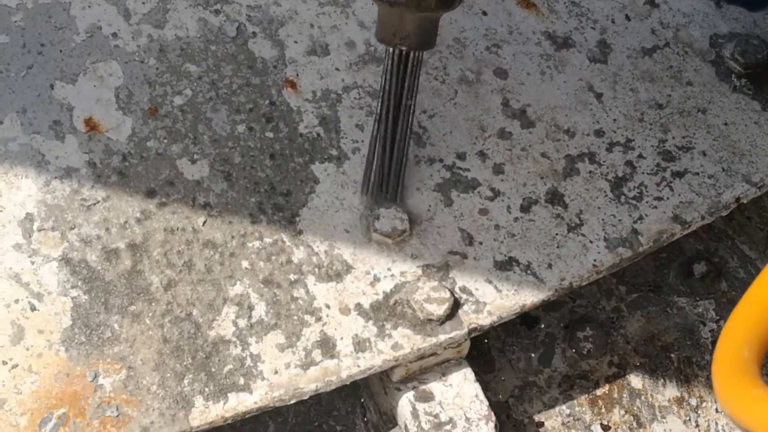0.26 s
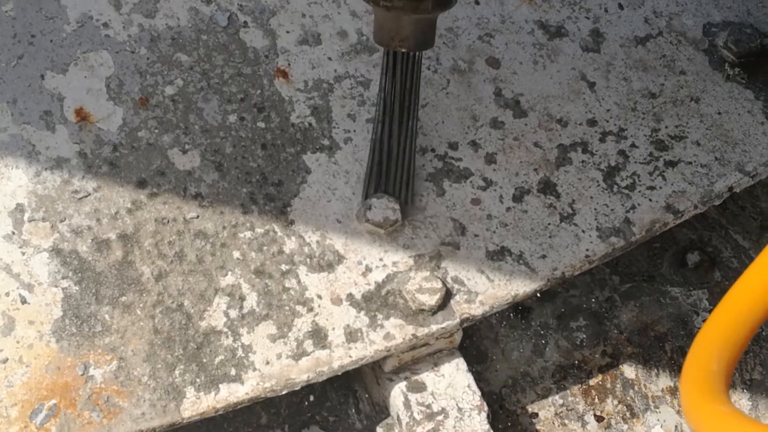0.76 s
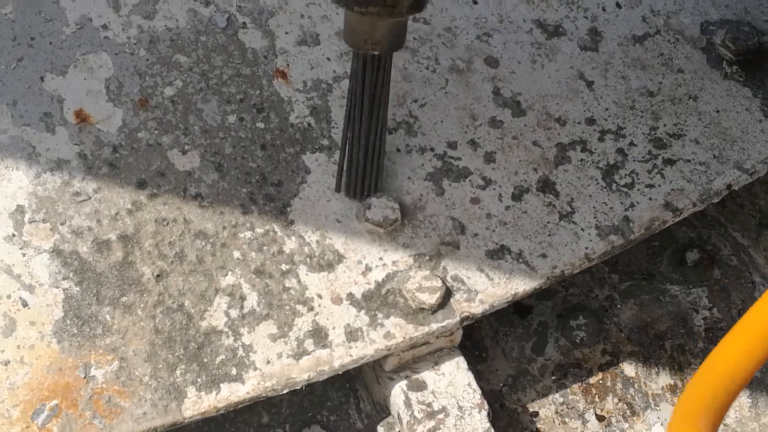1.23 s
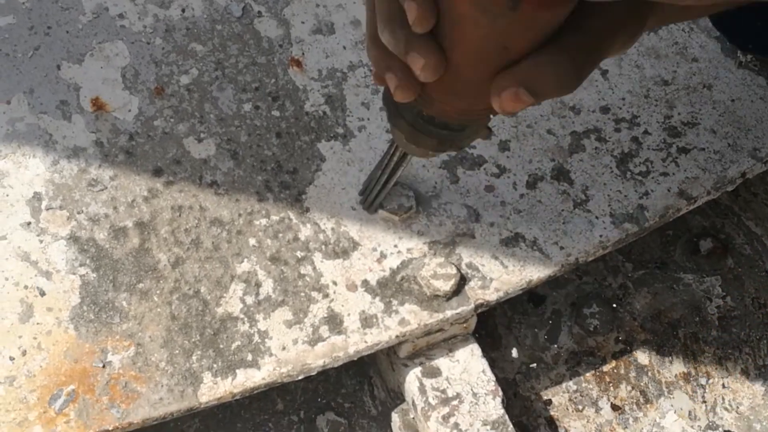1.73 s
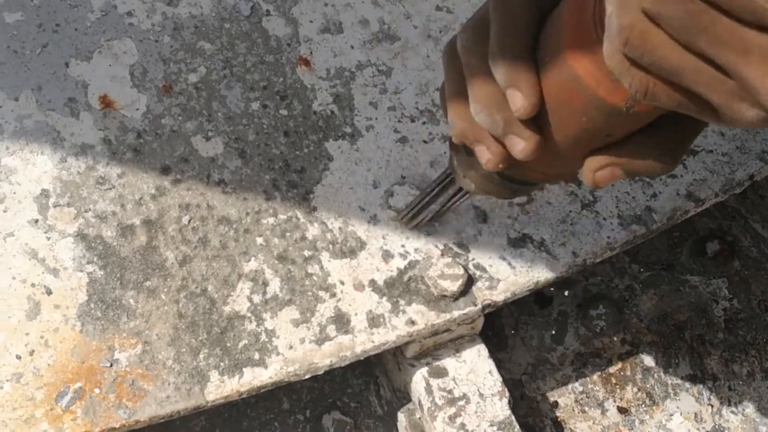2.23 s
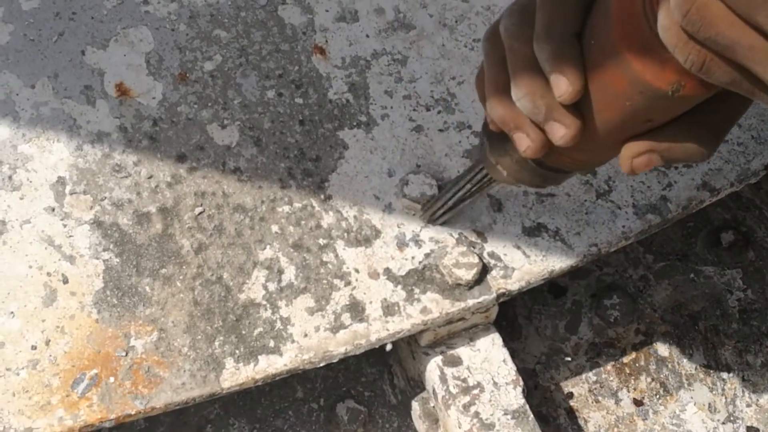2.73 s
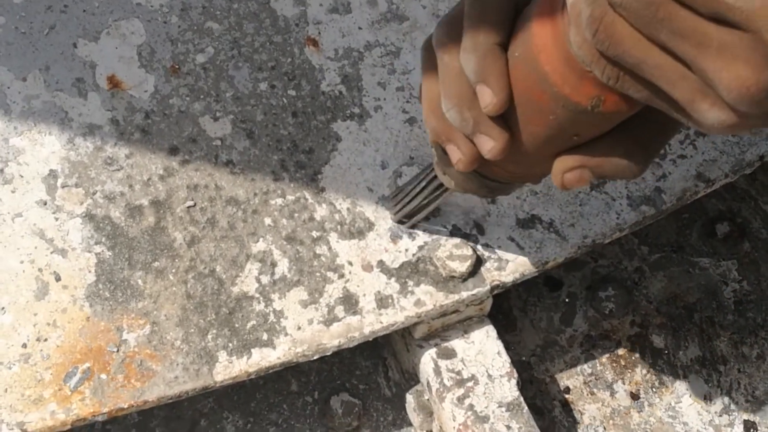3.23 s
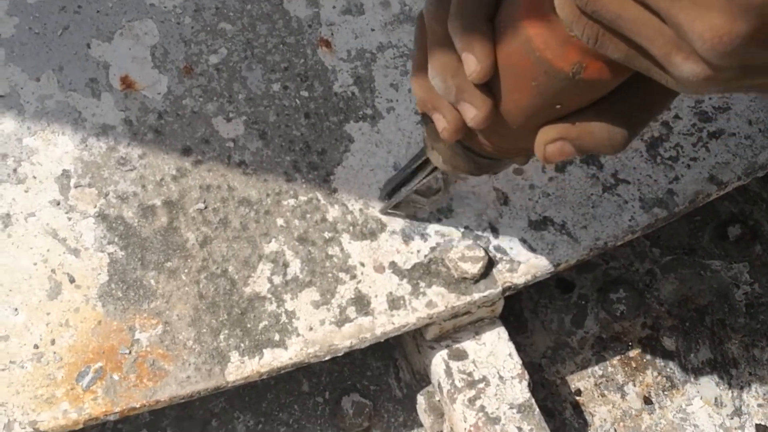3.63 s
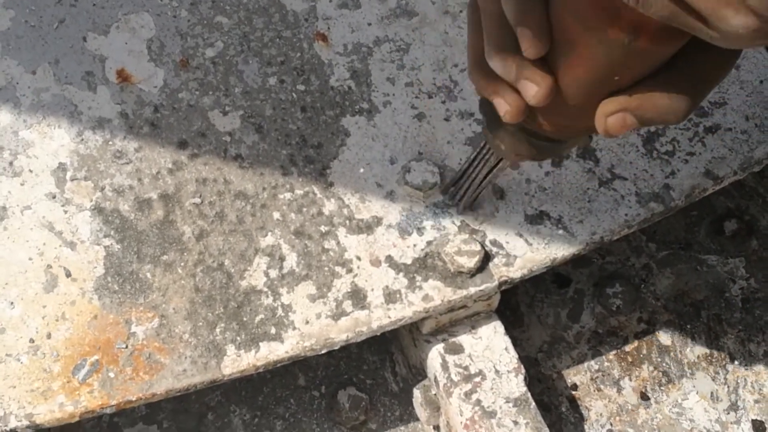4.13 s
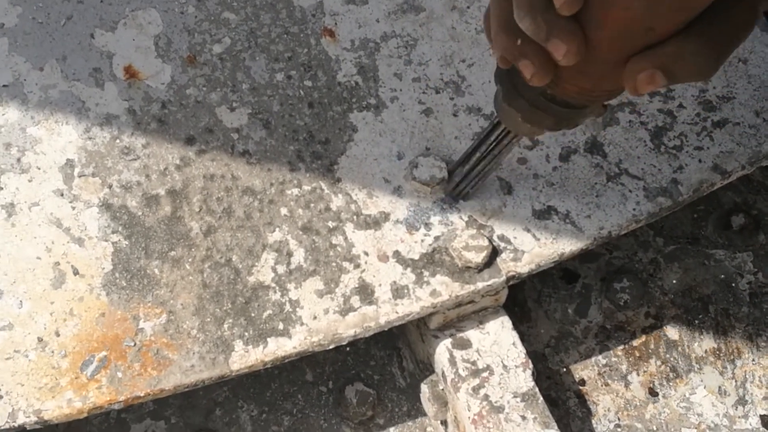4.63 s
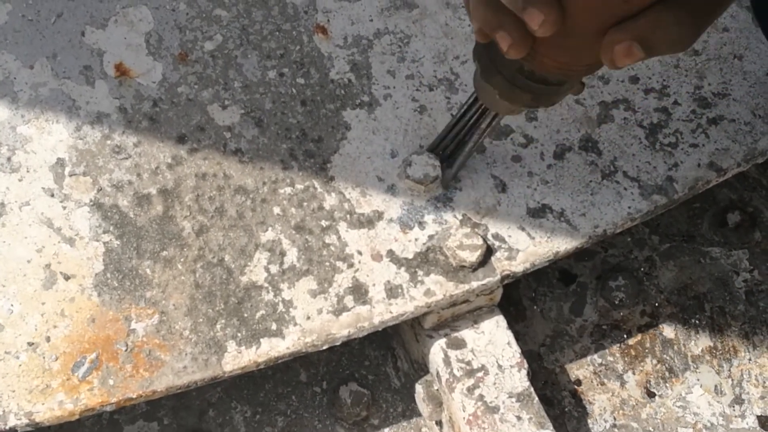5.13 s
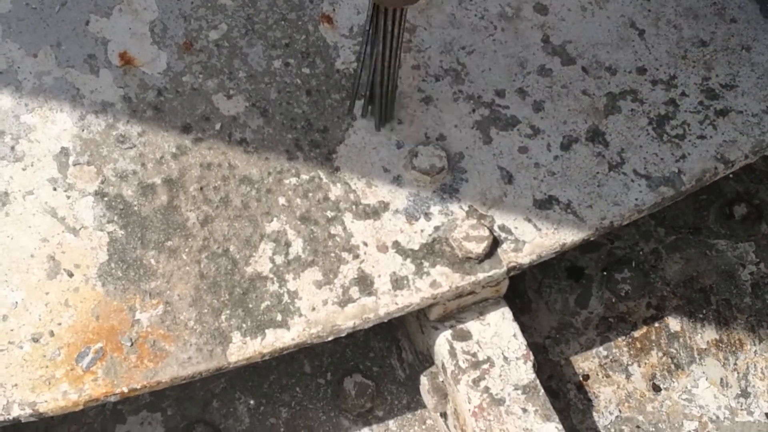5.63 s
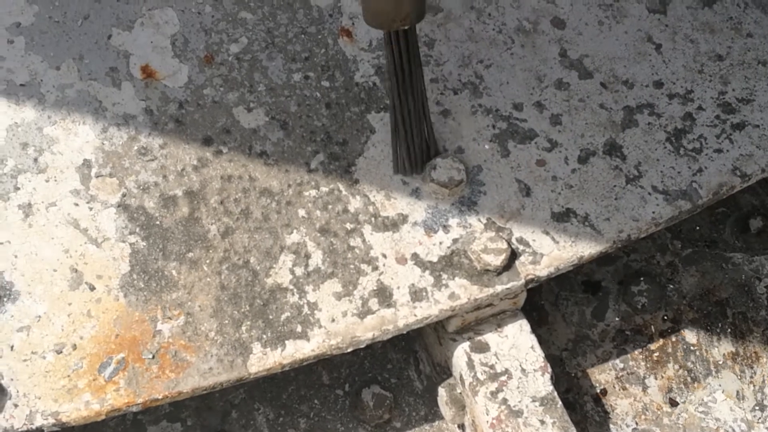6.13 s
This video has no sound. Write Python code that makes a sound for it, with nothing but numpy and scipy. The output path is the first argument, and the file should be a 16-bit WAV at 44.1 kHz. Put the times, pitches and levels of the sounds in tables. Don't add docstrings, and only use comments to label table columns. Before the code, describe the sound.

From 0 s a pneumatic needle scaler is already running hard right by the microphone: a dense metallic buzz-rattle at about 53 strokes a second, with bright ringing needle hiss, midrange plate clatter, throaty exhaust puffs and a low tool drone. Sharp flake cracks crowd the first 1.5 s, and a high shank ring sings out around 1.2 s. From about 1.6 to 5.2 s the tool leans over; cracks come sparser, the needle tone shifts, and the plate clatter presses forward near 3.6 s. Gritty skids appear at 1.6 s and between 4.1 and 5.7 s. After 5.5 s, upright again, crackling thickens until the cut at 6.4 s. Farther hammer blows boom and clang through the deck, paired roughly every half second until 3.5 s, then single near 3.8, 4.2, 4.7, 5.1, 5.6 and 6.0 s. The left is crisp; the right later and muffled.

```python
import sys
import numpy as np
from scipy import signal
from scipy.fft import rfft, irfft, next_fast_len
from scipy.io import wavfile
from scipy.ndimage import uniform_filter1d

SR = 44100
rng = np.random.default_rng(int(sys.argv[2]) if len(sys.argv) > 2 else 0)


def how_loud(loudness_db):
    steps = np.asarray(loudness_db, float) / 20
    return 10 ** steps


def log_audio(samples):
    frames = np.atleast_2d(samples).T
    limited = np.clip(frames, -1, 1)
    pcm = np.round(limited * 32767).astype(np.int16)
    wavfile.write(sys.argv[1], SR, pcm)


N = 280917
T = np.arange(N) / SR
HZ = np.fft.rfftfreq(next_fast_len(N + SR // 2), 1 / SR)

# [time_s, lead_strokes]
PISTON_LEAD = [(0, -.24), (.25, -.53), (.8, -.53), (1, -.86), (1.2, -.9), (1.5, -1.25), (1.8, -1.27),
               (2.2, -1.87), (2.75, -1.88), (2.95, -1.67), (3.25, -1.78), (3.8, -1.14), (4.1, -1.57),
               (4.4, -1.51), (4.75, -1.21), (5.7, -1.13), (6, -.89), (6.37, -.22)]
# [time_s, pressure_db, facing_db]
WORK = [(0, -1.5, 3), (.53, 0.5, -0.5), (1.04, -2.5, -1), (1.42, -0.5, -2.5), (2.18, -2.5, -1.5),
        (3.6, 1, -4.5), (4.03, -1, -1), (5.02, 1, -2), (5.62, 0.5, 1), (5.98, -1.5, -2.5), (6.37, -4, 1)]
# [time_s, upright_0_to_1]
STANCE = [(0, 0.8), (1.1, 0.93), (1.7, 0.6), (2.2, 0.06), (5.2, 0.23), (5.55, 1), (6.37, 1)]
# [time_s, covered_0_to_1]
GRIP = [(0, 0.07), (4.9, 0.08), (5.25, 0.11), (5.6, 0.09), (5.8, 0), (6.37, 0.09)]
# [time_s, level_db]
SHANK_SINGING = [(0, -1), (1.08, -7), (1.16, 4.5), (1.55, -4), (1.9, -5.5), (3.6, -6), (4.7, -3), (5.5, -4),
                 (5.75, -4), (6.37, -4)]

# [pitch_hz, width_hz, level_db]
NEEDLES_SLANT = [(6450, 510, -10), (7800, 170, -14), (8280, 1000, -10), (9800, 350, -7.5),
                 (13200, 300, -15), (14200, 200, -10.5)]
NEEDLES_UPRIGHT = [(4510, 300, -7), (6300, 360, -15), (8040, 490, -9), (9920, 380, -5.5)]
# [pitch_hz, width_hz, level_db]
SHANK_SLANT = [(13480, 110, -6), (13600, 110, -6)]
SHANK_UPRIGHT = [(13480, 120, -6), (13600, 120, -7.5)]
# [pitch_hz, width_hz, level_db]
SHANK_LONG = [(10597, 75, -2)]
# [pitch_hz, width_hz, level_db]
EXHAUST_OPEN = [(896, 123, 5), (1182, 176, -4), (1630, 67, -35)]
EXHAUST_COVERED = [(940, 150, -13.5), (1200, 960, 15), (1850, 96, 16)]
# [pitch_hz, density_db_per_hz]
NEEDLE_HISS = [(3000, -37), (5500, -17.5), (7000, -22), (9000, -16.5), (12000, -16.5), (15500, -18.5)]
PLATE_CLATTER = [(150, -18), (400, 0.5), (650, -0.5), (1200, -5.5), (2100, -1), (3300, 2.5), (4200, -2),
                 (5500, -7.5), (9000, -17), (16000, -10.5)]
TOOL_DRONE = [(20, -22), (50, -16), (100, -5), (170, 0), (250, -1), (400, -7), (700, -18), (1200, -40)]

# [start_s, peak_db, treble_db, shove_db]
FLAKES = [(.0228, -3.5, -8, -31), (.1194, -22, 11, -21), (.271, -8, 0, -19), (.5744, -5.5, 5, -27),
          (.745, -2.5, -20, -24), (.7984, -4, -17, -23), (.8799, -3.5, -18, -22), (.9385, -3.5, -21, -29),
          (1.2013, -1, -5, -34), (1.3062, -4.5, -24, -37), (1.66, -5.5, -9, -31), (1.9687, -14, 5, -18),
          (2.0685, -7, -20, -37), (2.2203, -12, 3, -27), (2.432, -16, -7, -16), (2.5066, -12.5, -2, -17),
          (2.7881, -9.5, -9, -20), (3.0485, -5, -24, -22), (3.2384, -9, -2, -19), (3.426, -16.5, 7, -27),
          (3.6282, -14, 7, -32), (3.9452, -18, 2, -25), (4.627, -7, -6, -20), (4.7951, -4.5, -9, -22),
          (4.9641, -1, -7, -25), (5.022, -11, -8, -20), (5.5284, 0, -5, -40), (5.9233, -10, -5, -21),
          (6.2113, -7.5, -3, -23), (6.326, -4, -9, -24)]
# [start_s,
# crack_db, treble_over_crack_db]
BITES = [(0.0421, -14.5, 9), (0.0954, -19, 18), (0.1573, -7, 1), (0.163, -7, 2), (0.1715, -9, -6),
         (0.1817, -21, -9), (0.196, -13, 10), (0.2342, -15, 16), (0.2538, -18, 7), (0.369, -9, 7),
         (0.4063, -4, 4), (0.4187, -10, -1), (0.4446, -10, -7), (0.4576, -14.5, -4),
         (0.4811, -12, 7), (0.4951, -16, -2), (0.5197, -9, 3), (0.587, -13, 13), (0.6133, -20, 9),
         (0.6263, -4, 1), (0.6406, -4, -9), (0.648, -16, -17), (0.655, -13, -13), (0.6626, -14, -7),
         (0.6684, -11, 16), (0.7076, -20, 19), (0.7215, -10, 2), (0.758, -8.5, 9), (0.7841, -20, 9),
         (0.824, -21, 18), (0.836, -20, 21), (0.8773, -12, 16.5), (0.9004, -14, 0),
         (0.913, -9.5, 6), (0.96, -20, 9), (0.972, -10, 0), (1.0343, -14.5, 10), (1.047, -11, 15),
         (1.0733, -23, 12), (1.0857, -20, 20), (1.0988, -9, -8), (1.1089, -11, 4), (1.122, -18, 18),
         (1.1347, -6, -4), (1.141, -17, -10), (1.1495, -3, -5), (1.1546, -14, -10),
         (1.1878, -14, 7), (1.2237, -25, 14), (1.262, -11, 2), (1.2748, -6.5, 0), (1.302, -8.5, -1),
         (1.3222, -5.5, 6), (1.3426, -12, 3), (1.3787, -16, 14), (1.3983, -15.5, 19),
         (1.4384, -10, 11), (1.4753, -11, 3), (1.5086, -16, 13), (1.5152, -6, -9),
         (1.5465, -7, 8), (1.5494, -9, 13), (1.5699, -9, 12), (1.6071, -7, 13), (1.62, -12, -1),
               (1.6241, -17, 4), (1.6317, -20, -3), (1.6458, -13, 3), (1.6634, -15, 6), (1.703, -8, 0),
               (1.7223, -12, 7), (1.74, -13, 1), (1.76, -28, 23), (1.894, -21, 14), (1.9117, -26, 17),
               (1.9518, -30, 21), (1.991, -19, 12), (1.9953, -12, -10), (2.0284, -21, 16),
               (2.0974, -6, -11), (2.107, -23, -9), (2.116, -18, -8), (2.1232, -7, 5), (2.1269, -11, 1),
               (2.167, -25, 16), (2.2986, -30, 16), (2.4484, 0, -15), (2.5816, -2, -10), (2.589, -10, -10),
               (2.5975, -18, -10), (2.6025, -16, -8), (2.62, -24, 9), (2.7322, -32, 11), (2.77, -19, 14),
               (2.9127, -3, -4), (2.919, -12, 6), (3.0329, -11.5, 15), (3.1444, -5.5, 3), (3.1829, -7.5, 2),
               (3.314, -24, 22), (3.364, -4, -5), (3.3696, -12, -2), (3.479, -24, 20), (3.505, -3, -5),
               (3.5093, 4, -11), (3.517, -11, 1), (3.555, -24, 15), (3.592, -18, 15), (3.716, -18.5, 22),
               (3.777, -32, 14), (3.8538, -23, 16), (3.9073, -25, 13), (3.9269, -25, 19), (3.9654, -19, 9),
               (4.0046, -32, 14), (4.0444, -9, 11), (4.0827, -10.5, 12), (4.1037, -20, 12),
               (4.1223, -14, 6), (4.2143, -26, 18),
         (4.2364, -9, -4), (4.256, -22, 4), (4.4252, -11, 8), (4.4624, -28, 14), (4.6827, -3, -3),
              (4.6902, -9, -8), (4.9082, -27, 21), (4.9831, -26, 8), (5.0756, -28, 18), (5.1199, -8, -10),
              (5.1647, -18.5, 17), (5.264, -27, 11), (5.283, -24, 19), (5.3182, -19, 19),
              (5.3336, -16, 9.5), (5.338, -16, 8), (5.3971, -11.5, 3), (5.4534, -13, 8), (5.4926, -9, 14),
              (5.547, -10, 15), (5.5669, -7, 5), (5.5868, -3, -4), (5.599, -11, 16), (5.606, -6, 0),
              (5.6253, -8, 9), (5.646, -9, 2), (5.663, -16, 6), (5.6766, -9, 10), (5.6847, -16, 1),
              (5.7008, -2, 1), (5.7205, -13, 16), (5.7404, -1, 1), (5.7735, -8, 5), (5.7923, -8, 15),
              (5.8101, -11, 19.5), (5.83, -11, 2), (5.8472, -22, 10), (5.864, -12, 7), (5.884, -18, 8),
              (5.8971, -8.5, 8), (5.9044, -5, -1), (5.9413, -12, 5), (5.9618, -26, 19), (5.975, -19, 20),
              (5.9801, -12, 3), (6.017, -8.5, 9), (6.024, -10, -5), (6.034, -21, 7), (6.054, -6.5, 5),
              (6.0686, -17, 1), (6.0861, -9, 1), (6.1225, -4, 9), (6.1414, -4, -7), (6.2159, -8, 8),
              (6.23, -11, 2), (6.253, -25, 15), (6.269, -3.5, 6.5), (6.2882, -15, 7), (6.307, -13, 8),
              (6.3623, -18, 16)]
# [pitch_hz, density_db_per_hz]
FLAKE_CRACK = [(150, -7), (600, -4.5), (1500, 0.5), (3000, -1.5), (5000, 0.5)]
# [pitch_hz, width_hz, level_db]
SCALE_SPOTS = [
    [(1550, 130, -7.5), (3410, 460, 4)],
    [(2540, 190, -1), (4400, 320, -3)],
    [(1800, 200, -8), (3840, 190, 4)],
]
# [pitch_hz, width_hz, level_db]
NEEDLE_TIPS = [(6530, 460, -1.5), (8180, 500, -8.5), (9380, 340, -5.5)]
# [start_s, length_s, level_db]
SKIDS = [
    (.24, 0.046, -34),
    (1.58, 0.11, -23),
    (4.147, 0.042, -24.5),
    (4.265, 0.023, -31),
    (5.163, 0.094, -27),
    (5.261, 0.056, -29),
    (5.33, 0.063, -22.5),
    (5.448, .04, -26),
    (5.557, .07, -29),
    (5.66, 0.11, -25.5),
]
# [pitch_hz, density_db_per_hz]
SCRAPE = [(300, -28), (900, -5), (1300, 3.5), (2200, -6), (3200, 1), (4600, -4.5), (7000, -14),
          (16000, -22)]

# [start_s, peak_db, boom_db, clang_db, knock_db]
HAMMER = [(0.158, -7.5, -4, -7, -20), (0.236, -22.5, -2, -6, 15), (0.6432, -5.5, -4.5, -10, -11),
          (1.0982, -14, -5, -9.5, 9), (1.1345, -7, -7, -11, -2), (1.5473, -11.5, -13, -5, -2),
          (1.6145, -6.5, -10, -13.5, -25), (1.995, -16, -2.5, -16, 8), (2.0963, -8.5, -4, -8, -4),
          (2.4468, -12.5, -9, -9.5, 7.5), (2.5803, -7.5, -4, -9.5, -6), (2.9144, -13, -10, -9, 7.5),
          (3.0428, -7.5, 1.5, -13, -6), (3.367, -16, -6, -5.5, 9), (3.5035, -7, -3, -8, -9),
          (3.817, -26, -13, -49, 17), (4.237, -16, -23, -6.5, 5.5), (4.6866, -11.5, -9, -14, 10.5),
          (5.1208, -23.5, 8, 0, 14), (5.5671, -15, -4.5, -8, -8), (6.0251, -14, -0.5, -18, 8.5)]
# [pitch_hz, level_db, t60_s]
BOOM = [(167, -15.5, 0.76), (237, 0, 0.24), (293, -6, 0.082), (337.7, -5.5, 0.15), (408, -6, 0.27),
        (484.7, -8.5, 0.4)]
# [pitch_hz, density_db_per_hz]
BLOW = [(60, -28.5), (150, -6.5), (500, -3.5), (700, -2.5), (1000, -6.5), (1800, -2), (2300, -8.5),
        (4000, -10.5), (6000, -24.5), (10000, -34.5)]
# [pitch_hz, width_hz, level_db]
DECK = [(895, 99, -2), (1550, 37, 4), (1770, 50, -12), (2620, 74, 4), (2800, 950, -4), (3880, 56, -48)]
# [pitch_hz, t60_s]
DECK_T60 = [(100, 0.89), (260, 0.31), (700, 0.39), (1840, 0.14), (4850, 0.089)]
# [pitch_hz, width_hz, level_db]
NEAR_PANEL = [(950, 190, 0)]

# [pitch_hz, weaker_db, later_rad, likeness_0_to_1, more_weaker_when_upright_db]
NEAR_SHADOW = [(20, 0, .1, .97, 0), (170, 0, .7, .92, 0), (350, 2, 1.6, .9, 0), (690, 8, 3.2, .8, 0),
               (800, 9, 4.6, .3, 0), (950, 7, 6.3, .75, 1), (1550, 4, 6.5, .75, 3), (2240, 2, 7.8, .45, 5),
               (3400, 4, 7.6, .35, 4), (4100, 3, 9.7, .45, 4), (4900, 13, 10.5, .3, 0),
               (5900, 14, 10.8, .3, 0), (7750, 24, 14.5, .55, 1), (15000, 36, 32, .45, 0)]
# [pitch_hz, weaker_db, later_rad, likeness_0_to_1, more_weaker_when_upright_db]
FAR_SHADOW = [(20, -1, .1, .97, 0), (170, -1, 1, .97, 0), (350, 0, 1.7, .95, 0), (690, 6, 3, .9, 0),
              (1030, 9, 3.3, .5, 0), (1300, 4, 4.5, .4, 0), (1700, 11, 5.2, .4, 0), (2800, 6, 6.3, .35, 0),
              (4100, 5, 10.5, .4, 0), (5900, 10, 10.5, .3, 0), (7750, 23, 14.2, .4, 0),
              (15000, 30, 32, .4, 0)]


def strokes(listed):
    beat = 53 * T + curves(PISTON_LEAD)[0]
    even = np.interp(np.arange(340) - .1, beat, T, right=7)
    nearest = np.abs(listed - even[:, None]).argmin(axis=1)
    off = listed[nearest] - even
    hard = np.abs(off) < .003
    return even + np.interp(even, even[hard], off[hard]), hard


def scaler(listed):
    press_db, facing_db = curves(WORK)
    upright = np.clip(curves(STANCE)[0], 0, 1)
    hit, hard = strokes(listed)
    luck = rng.standard_normal((len(hit), 5))
    force_db = 1.7 * luck[:, 0] - 3.5 * ~hard
    early_db = -7.5 + 2.5 * luck[:, 2] - 3.5 * (np.arange(len(hit)) % 2)
    blur = np.exp(.5 * luck[:, 1]) * np.where(hard, 1, 2.2)
    ring = needles(hit, force_db, early_db, blur, upright)
    landing_db = force_db + 1.2 * luck[:, 3]
    clatter = plate(hit, landing_db, early_db + 3 * np.interp(hit, T, upright), blur)
    puffs = exhaust(hit, 0.3 * force_db + .9 * luck[:, 4])
    hum = drone(hit, force_db)
    mix = how_loud(-21.5 + 0.05 * press_db) * unit(ring)
    mix = mix + how_loud(-26 + press_db) * unit(clatter)
    mix = mix + how_loud(-29.5 + facing_db) * unit(puffs)
    return mix + how_loud(-35 + 0.64 * press_db) * unit(hum)


def needles(hit, force_db, early_db, blur, upright):
    chatter = how_loud(3 * rng.standard_normal(N)) * rng.standard_normal(N)
    volley = volleys(hit, force_db, early_db, blur, head=0.0013, tail=.0042, tail_db=-5, count=45)
    knocks = volley + how_loud(-8.5) * unit(chatter)
    ring = filtered(knocks * (1 - upright), causal(NEEDLE_HISS, NEEDLES_SLANT + SHANK_SLANT))
    ring = ring + filtered(knocks * upright, causal(NEEDLE_HISS, NEEDLES_UPRIGHT + SHANK_UPRIGHT))
    ring = ring + filtered(knocks * how_loud(curves(SHANK_SINGING)[0]), ringing(SHANK_LONG))
    return patchy(ring, depth_db=2.0)


def plate(hit, force_db, early_db, blur):
    landing = volleys(hit, force_db, early_db, blur, head=.0006, tail=.0035, tail_db=-7, count=20)
    grit = patchy(rng.standard_normal(N), depth_db=5.0)
    return filtered(landing + how_loud(-4) * unit(grit), causal(PLATE_CLATTER))


def exhaust(hit, puff_db):
    puffs = taps(hit - 0.0003, puff_db, .0014, scatter_db=1.0, count=40)
    air = unit(puffs) + how_loud(-4) * rng.standard_normal(N)
    covered = np.clip(curves(GRIP)[0], 0, 1)
    open_part = filtered(air * (1 - covered), ringing(EXHAUST_OPEN))
    return open_part + filtered(air * covered, ringing(EXHAUST_COVERED))


def drone(hit, force_db):
    thuds = taps(hit, force_db, 0.00242, scatter_db=0.5, count=4)
    return filtered(unit(thuds) + how_loud(-1.5) * rng.standard_normal(N), causal(TOOL_DRONE))


def volleys(hit, force_db, early_db, blur, head, tail, tail_db, count):
    early = hit - .0052 + .0008 * rng.standard_normal(len(hit))
    tight = taps(hit, force_db, head * blur, scatter_db=2, count=count)
    tight = tight + taps(early, early_db - 1, head, scatter_db=2, count=count)
    loose = taps(hit, force_db + tail_db, tail, scatter_db=3, count=3 * count)
    loose = loose + taps(early, early_db + tail_db, .7 * tail, scatter_db=3, count=3 * count)
    return unit(tight + loose)


def strikes():
    s, db, treble_db = np.transpose(BITES)
    shove_db = -29 + 4.5 * rng.standard_normal(len(s))
    bites = np.c_[s + .0004, db + 1, treble_db - 9, shove_db]
    return np.r_[FLAKES, bites]


def flakes(hard):
    s, db, treble_db, shove_db = np.transpose(hard)
    spot = np.arange(len(s)) % len(SCALE_SPOTS)
    colour = [(30, -32.0)] + FLAKE_CRACK + [(8000, -14.5), (16000, -16)]
    crack = 0
    for k, modes in enumerate(SCALE_SPOTS):
        at, size_db = s[spot == k], db[spot == k] + 6.5
        snap = taps(at, size_db, .0003, scatter_db=0.5, count=15)
        crumbs = taps(at, size_db - 12, .0017, scatter_db=3.5, count=40)
        crack = crack + filtered(snap + crumbs, causal(colour, modes))
    kick_db = db + treble_db + 4.5
    kick = taps(s, kick_db, .0013, scatter_db=1, count=60)
    kick = kick + taps(s, kick_db - 7, .0028, scatter_db=1.5, count=80)
    bright = filtered(kick, causal(NEEDLE_HISS, NEEDLE_TIPS + SHANK_UPRIGHT))
    push_db = np.minimum(db + shove_db, -31)
    push = np.bincount((s * SR).astype(int), -how_loud(push_db + 42.0), N)[:N]
    shove_spectrum = [(1, -9), (15, 10.0), (40, 9.5), (100, 9.0), (300, -2.5), (900, 6.0), (3000, -84.0)]
    return crack + bright + filtered(push, causal(shove_spectrum))


def skids():
    swell = 0
    for s, length, db in SKIDS:
        swell = swell + how_loud(db) * np.sin(np.pi * np.clip((T - s) / length, 0, 1)) ** .5
    grains = how_loud(5 * rng.standard_normal(N)) * rng.standard_normal(N)
    return swell * unit(patchy(filtered(grains, causal(SCRAPE)), depth_db=5.0))


def deck_wash(t, rise_s):
    hz, frames, z = signal.stft(rng.standard_normal(len(t)), SR, nperseg=256)
    fade_db = -60 * frames / along(DECK_T60, hz)[:, None]
    wash = signal.istft(z * how_loud(fade_db), SR, nperseg=256)[1][:len(t)]
    return wash * (1 - np.exp(-t / max(rise_s, 2e-4)))


def deck_boom(t):
    ring = 0
    luck = rng.standard_normal((len(BOOM), 2))
    for (hz, level, t60), (a, b) in zip(BOOM, luck):
        ring = ring + how_loud(level + 2 * a - 60 * t / t60) * np.sin(2 * np.pi * hz * (1 + 0.016 * b) * t)
    return ring


def packet(t, arrive_s, hz, width_s):
    return np.cos(2 * np.pi * hz * (t - arrive_s)) * np.exp(-((t - arrive_s) / width_s) ** 2)


def hammer():
    dull, clang, knock, boom = np.zeros((4, N + SR))
    t = np.arange(SR // 2) / SR
    swing = 1 + .4 * np.exp(-t / .012)
    thump = packet(t, arrive_s=0.00579, hz=328, width_s=0.0029)
    thock = packet(t, arrive_s=0.00464, hz=867, width_s=0.0015)
    for s, db, boom_db, clang_db, knock_db in HAMMER:
        wash = deck_wash(t, rise_s=0.0022 * how_loud(0.35 * (db + boom_db - 1.0)))
        ring = deck_boom(t)
        at = round(s * SR)
        ahead = round(0.003 * SR * (db < -10.5))
        dull[at:][:len(t)] += how_loud(db + 15.0) * wash
        clang[at - ahead:][:len(t)] += how_loud(db + clang_db + 24.5) * wash
        knock[at:][:len(t)] += how_loud(db + knock_db + 12.0) * wash * how_loud(-60 * t / 0.26)
        boom[at:][:len(t)] += how_loud(db + boom_db - 6.5) * ring * (1 - np.exp(-t / 0.002)) * swing
        boom[at:][:len(t)] += how_loud(db + boom_db + 0.5) * thump
        boom[at:][:len(t)] += how_loud(db + max(knock_db + 1, -5)) * thock
    upper = 1 / (1 + (2300 / (HZ + 1)) ** 6)
    lower = 1 / (1 + (HZ / 1150) ** 6)
    body = causal(BLOW) + how_loud(-7.0) * ringing(DECK)
    body = body * np.exp(-2j * np.pi * .004 * (2 * np.sqrt(850 * HZ) - .5 * HZ))
    mix = boom[:N] + filtered(dull[:N], body * (1 - upper) * how_loud(-5 * lower))
    mix = mix + filtered(knock[:N], ringing(NEAR_PANEL))
    return mix + filtered(clang[:N], body * upper)


def ports(x, shadow):
    hz, weaker_db, later, alike, upright_db = np.transpose(shadow)
    z = signal.stft(x, nperseg=128)[2]
    scattered = signal.istft(z * np.exp(2j * np.pi * rng.random(z.shape)), nperseg=128)[1][:N]
    scattered = scattered * np.std(x) / np.std(scattered)
    alike = along(np.transpose([hz, alike]))
    dulled = how_loud(-along(np.transpose([hz, weaker_db]))) * np.exp(-1j * np.interp(HZ, hz, later))
    slanted = filtered(x, dulled * alike) + filtered(scattered, dulled * np.sqrt(1 - alike ** 2))
    upright = filtered(slanted, how_loud(-along(np.transpose([hz, upright_db]))))
    share = np.clip(curves(STANCE)[0], 0, 1)
    return np.array([x, slanted + share * (upright - slanted)])


def taps(times, db, spread, scatter_db, count):
    late = np.asarray(spread)[..., None] * rng.exponential(1, (len(times), count))
    size = how_loud(np.asarray(db)[:, None] + scatter_db * rng.standard_normal(late.shape))
    size = size * rng.choice([-1, 1], late.shape)
    at = ((np.asarray(times)[:, None] + late) * SR).astype(int)
    at = np.clip(at, -1, N) % (N + 1)
    return np.bincount(at.ravel(), size.ravel(), N + 1)[:N]


def patchy(x, depth_db):
    z = signal.stft(x, nperseg=256)[2]
    field = uniform_filter1d(rng.standard_normal(z.shape), size=3, axis=0)
    field = uniform_filter1d(field, size=14, axis=1)
    return signal.istft(z * how_loud(depth_db * unit(field)), nperseg=256)[1][:N]


def ringing(modes):
    total = 0
    for k, (c, w, db) in enumerate(modes):
        total = total + (-1) ** k * how_loud(db) * 1j * HZ * w / (c * c - HZ * HZ + 1j * HZ * w)
    return total


def causal(spectrum, modes=()):
    power = how_loud(along(spectrum)) ** 2 + sum(np.abs(ringing([mode])) ** 2 for mode in modes)
    cepstrum = irfft(np.log(power) / 2)
    fold = np.zeros(len(cepstrum))
    fold[:len(HZ)] = 2
    fold[0] = 1
    return np.exp(rfft(cepstrum * fold))


def filtered(x, response):
    m = 2 * (len(HZ) - 1)
    return irfft(rfft(x, m) * response, m)[..., :N]


def along(points, hz=HZ):
    f, v = np.transpose(points)
    return np.interp(np.log(hz + 1), np.log(f + 1), v)


def curves(rows):
    s, *cols = np.transpose(rows)
    return [np.interp(T, s, c) for c in cols]


def unit(x):
    return x / np.sqrt(np.mean(x ** 2) + 1e-20)


def scene():
    hard = strikes()
    near = scaler(hard[:, 0]) + flakes(hard) + skids()
    return ports(near, NEAR_SHADOW) + ports(hammer(), FAR_SHADOW)


def roll_off(x):
    return signal.sosfilt(signal.butter(12, 16430, fs=SR, output="sos"), x)


def record(dry):
    x = dry / (1 + np.abs(dry / 0.94) ** 4) ** (1 / 4)
    x = filtered(x, np.clip((15800 - HZ) / 150 + .5, 0, 1) ** 3)
    return roll_off(x)


dry = scene()
out = record(dry)
log_audio(out)
```